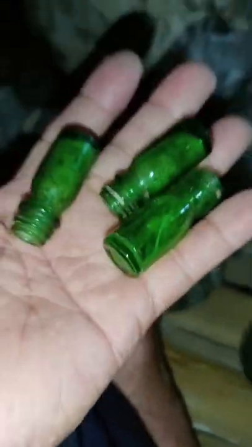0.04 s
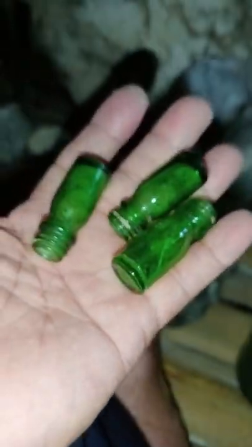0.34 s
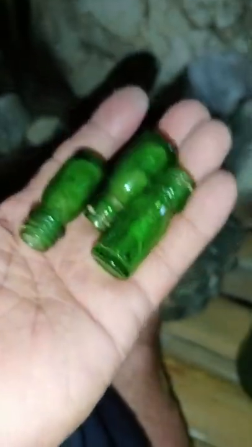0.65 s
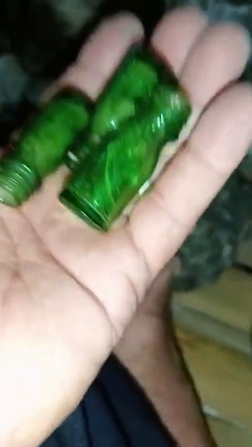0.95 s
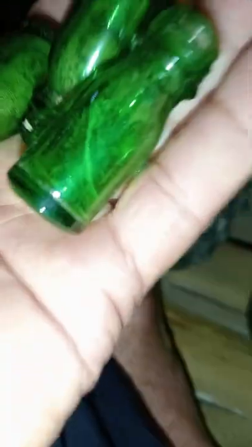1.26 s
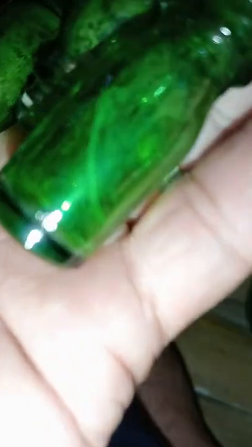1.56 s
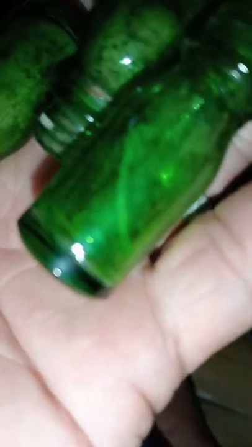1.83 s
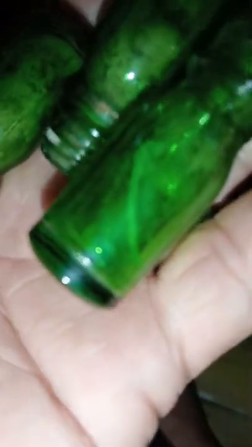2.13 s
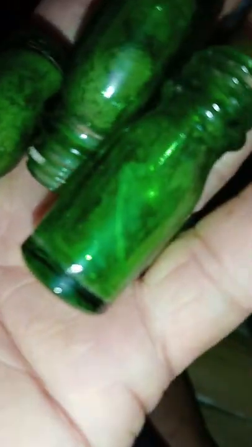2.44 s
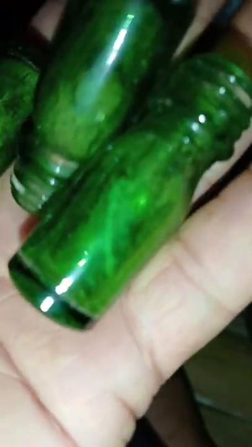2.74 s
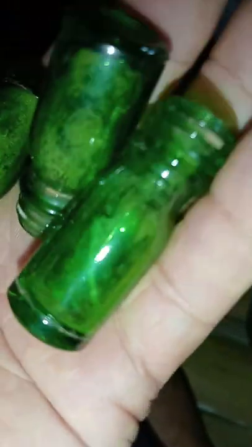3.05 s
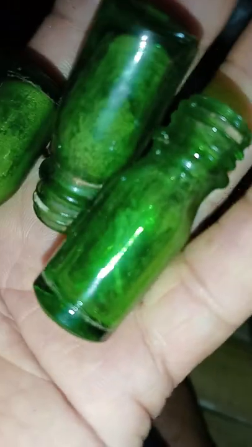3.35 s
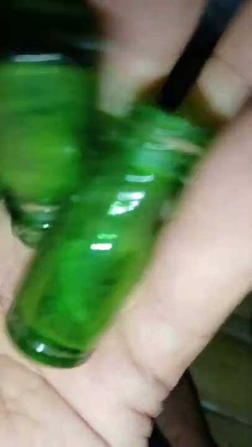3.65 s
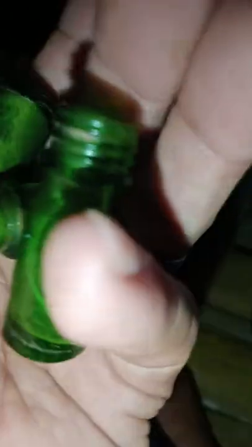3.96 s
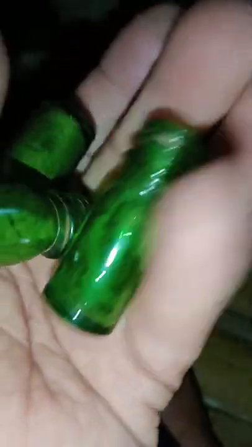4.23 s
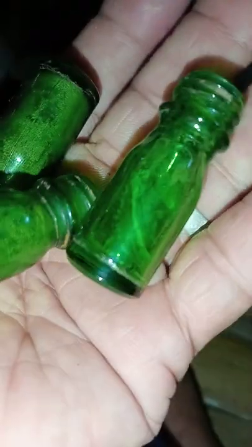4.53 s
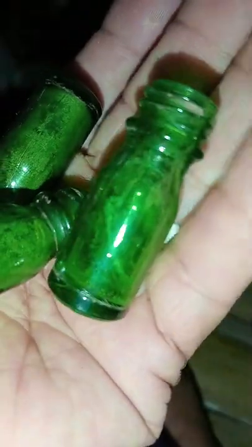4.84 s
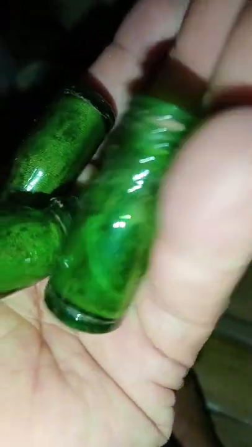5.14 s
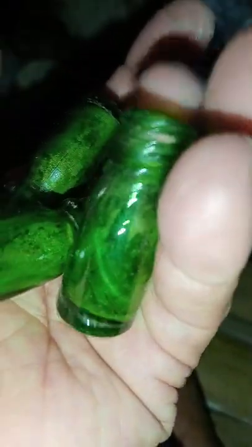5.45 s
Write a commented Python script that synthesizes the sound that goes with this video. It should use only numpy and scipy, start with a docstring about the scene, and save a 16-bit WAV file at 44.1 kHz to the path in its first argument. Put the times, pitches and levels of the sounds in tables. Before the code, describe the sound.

In a quiet spot open to the night, insects keep up a faint, high hiss with occasional thin chirps. Right by the microphone, little glass bottles shift in a hand: first a brief double clink, then scattered soft taps, then a bright flurry of knocks as they tumble together, and finally one more crisp clink. Skin cuts each ring short, and nearby surfaces add only a slight echo.

```python
"""A spot open to the night outside, with surfaces close by that answer briefly. Near the microphone,
three small glass bottles roll against each other in an open palm. The skin damps each contact to a
short clink, and the air in the bottles rings hollow. From outside come insects scraping their wings,
a few thin chirps and faint far whistles over a low hush."""
import sys
import numpy as np
from scipy import signal
from scipy.fft import rfft, irfft
from scipy.io import wavfile

SR = 44100
rng = np.random.default_rng(int(sys.argv[2]) if len(sys.argv) > 2 else 0)


def dump_mix(stems):
    """Bounce the given channels to the path in sys.argv[1] as a 16-bit WAV at rate SR."""
    frames = np.atleast_2d(stems).T  # one column per channel
    limited = np.clip(frames, -1, 1)  # hard clip at full scale
    pcm = np.round(limited * 32767).astype(np.int16)
    wavfile.write(sys.argv[1], SR, pcm)


N = 250929
TIME = np.arange(N) / SR


def from_db(db):
    return 10 ** (np.asarray(db) / 20)


def unit_rms(x):
    return x / np.sqrt(np.mean(x ** 2) + 1e-20)


def add(track, start, sound):
    """Mix a sound into a track at a start time in seconds."""
    at = max(0, round(start * SR))
    track[at:at + len(sound)] += sound[:N - at]


def butter(x, hz, kind, order=2):
    return signal.sosfilt(signal.butter(order, hz, kind, fs=SR, output="sos"), x)


def resonate(x, hz, width_hz):
    """Two-pole resonance with gain 1 at its peak."""
    radius = np.exp(-np.pi * width_hz / SR)
    feedback = [1, -2 * radius * np.cos(2 * np.pi * hz / SR), radius ** 2]
    return signal.lfilter(np.array([1, 0, -1]) * (1 - radius ** 2) / 2, feedback, x)


def drift(per_s):
    """Random wandering with a spread of about 1."""
    knots = rng.standard_normal(2000)
    return np.interp(TIME * per_s, np.arange(len(knots)), knots)


def throb(per_s, depth_db):
    """Slightly uneven pulsing of a song's level."""
    return from_db(depth_db * np.sin(2 * np.pi * (per_s * TIME + 0.36 * drift(2.7))))


def shaped_noise(spectrum):
    """Steady noise with the given spectrum; rms 1."""
    hz, db = np.transpose(spectrum)
    bin_hz = np.maximum(np.fft.rfftfreq(2 * N, 1 / SR), 1)
    gain = from_db(np.interp(np.log(bin_hz), np.log(hz), db))
    return unit_rms(irfft(rfft(rng.standard_normal(2 * N)) * gain)[:N])


def echoes(x, t60, build_s, band_hz):
    """Dense reflections that build up and die away; the tail has unit energy."""
    t = np.arange(SR // 2) / SR
    envelope = from_db(-60 * t / t60) * (1 - np.exp(-(t / build_s) ** 2))
    tail = butter(rng.standard_normal(len(t)), band_hz, "band") * envelope
    return signal.fftconvolve(x, tail / np.linalg.norm(tail))[:N]


# The background of the place. Each row: frequency in Hz, relative spectral level in dB.
HUSH_SPECTRUM = [(15, -41), (25, -29), (65, -2.5), (118, 3), (155, -1.5), (236, -2.5), (349, -4), (375, -4),
                 (506, -7), (595, -8.5), (1140, -13), (3970, -18), (6300, -23), (8190, -48), (13900, -120)]
def hush(level_db=-67.5, waver_db=0.15):
    """Low hush and hiss behind everything, steady but for a slight waver."""
    return from_db(level_db + waver_db * drift(per_s=3.18)) * shaped_noise(HUSH_SPECTRUM)


def wing_song(hz, width_hz):
    """An insect's scraping, heard through its wing resonance; rms 1."""
    scrape = rng.standard_normal(N)
    return unit_rms(resonate(resonate(scrape, hz, width_hz), hz, width_hz))


def crickets():
    """Three trills from outside, each a pulsing wing resonance."""
    low = from_db(-74.5) * wing_song(7097, 230) * throb(9.5, depth_db=2)
    middle = from_db(-68) * wing_song(8073, 700) * throb(10, depth_db=2)
    high = from_db(-77) * wing_song(8390, 360) * throb(9.4, depth_db=10)
    return low + middle + high


# One insect outside. Each row: start and end in seconds, opening level in dB, swell in dB per second.
BUZZ_BOUTS = [(-0.1, 0.986, -68, -1.0), (1.185, 2.74, -71.5, 0.8), (2.99, 4.573, -71, 3.0),
              (4.897, 5.09, -72, 0), (5.09, 5.8, -67, 0.5)]
def high_buzz(fade_s=0.11, far_db=-80.5):
    """Wings buzz in bouts around a narrow whine; others of the kind carry on far away."""
    bouts = np.zeros(N)
    for start, end, db, swell_db_per_s in BUZZ_BOUTS:
        gate = np.clip(0.5 + np.minimum(TIME - start, end - TIME) / fade_s, 0, 1)
        bouts += gate * from_db(db + swell_db_per_s * (TIME - start))
    wings = wing_song(11100, 400) + from_db(-2.5) * wing_song(10550, 770)
    whine = from_db(-4) * wing_song(10900, 70)
    return np.hypot(bouts, from_db(far_db)) * wings + bouts * whine


# Insects in the distance. Each row: frequency in Hz, relative spectral level in dB.
CHORUS_SPECTRUM = [(6000, -61), (6700, -19), (7500, -19), (8300, 1.5), (9300, 1), (10500, 14), (11300, 9.5),
                   (12000, -5), (13000, 2.5), (15500, 0.5)]
def far_chorus():
    """Many far insects merge into a steady high hiss."""
    return from_db(-71) * butter(shaped_noise(CHORUS_SPECTRUM), 7100, "high", order=4)


# Calls far from the microphone. Each row: start and length in seconds, pitch in Hz, level in dB.
WHISTLE_CALLS = [(-0.03, 0.081, 1010, -69.5), (0.111, 0.29, 970, -71), (0.404, 0.14, 1032, -69.5),
                 (0.492, 0.059, 2013, -66.5), (2.896, 0.12, 1634, -73.5)]
def far_whistles(fade_s=0.024):
    """Faint, wavering tones that flutter, blurred by their echoes."""
    calls = np.zeros(N)
    waver = 1 + 0.0145 * drift(per_s=80)
    for start, length, hz, db in WHISTLE_CALLS:
        gate = np.clip(np.minimum(TIME - start, start + length - TIME) / fade_s, 0, 1)
        calls += from_db(db) * gate * np.sin(2 * np.pi * hz * np.cumsum(waver) / SR)
    calls *= throb(15, depth_db=5.5)
    blur = echoes(calls, t60=0.15, build_s=0.006, band_hz=[500, 3000])
    return from_db(-4) * calls + from_db(-8) * blur


# Chirps outside, near and far. Each row: time in seconds, pitch in Hz, level in dB,
# share from 0 to 1 that reaches the microphone directly.
CHIRP_CALLS = [(0.075, 5270, -68.5, .15), (0.28, 5240, -66, 0.3), (2.08, 5050, -75, 0.1),
               (2.30, 4950, -73, .3), (2.554, 4590, -59.5, 0.96), (2.84, 4640, -61, 1),
               (3.43, 5370, -67.5, 0.6), (3.86, 5300, -65, 0), (4.074, 5080, -52, 1),
               (4.317, 5100, -52, 0.87)]
def pips(count=3, gap_s=0.0325):
    """The evenly spaced pips of every call, the first one lower and softer."""
    for start, hz, db, share in CHIRP_CALLS:
        yield start, hz - 110, db - 4, share
        for k in range(1, count):
            yield start + k * gap_s, hz, db, share


def chirps(pip_s=0.0061, fall_hz_per_s=28000, haze_s=0.018):
    """Thin falling pips; their lower ends linger as a diffuse echo, and far ones arrive only as a haze."""
    direct, scattered = np.zeros((2, N))
    t = np.arange(-SR // 14, SR // 14) / SR
    for centre, hz, db, share in pips():
        pip = np.exp(-(t / pip_s) ** 2) * np.sin(2 * np.pi * (hz - fall_hz_per_s * t / 2) * t)
        add(direct, centre + t[0], share * from_db(db) * pip)
        smear_s = pip_s + haze_s * (1 - share) ** 2
        swell = from_db(db) * np.sqrt(pip_s / smear_s) * np.exp(-(t / smear_s) ** 2)
        haze = butter(rng.standard_normal(len(t)), [hz - 450, hz + 150], "band", order=3)
        add(scattered, centre + t[0], swell * unit_rms(haze))
    return direct + from_db(-7) * echoes(scattered, t60=0.29, build_s=0.0016, band_hz=[2500, 7000])


def ringing(modes, t, scatter_db, detune):
    """Decaying sines; every blow shares its force out anew and meets a slightly different bottle."""
    hz, db, t60 = np.transpose(modes)[:, :, None]
    strength, shift = rng.standard_normal((2, len(modes), 1))
    sign = (-1) ** np.arange(len(modes))[:, None]
    decay = from_db(db + scatter_db * strength - 60 * t / t60)
    return np.sum(sign * decay * np.sin(2 * np.pi * hz * (1 + detune * shift) * t), axis=0)


# Glass on glass, close to the microphone. Each row: start in seconds, level in dB, number of touches,
# seconds to the first rebound, frequency in Hz that the touched spot favours, low cutoff in Hz,
# top in Hz set by the hardness of the touch, relative level of the hollow ring in dB.
BOTTLE_CONTACTS = [ (0.507, -53.5, 1, 0, 4700, 3500, 6500, -24),
                   (0.5492, -21.5, 3, 0.0047, 5200, 4260, 10000, -20.5),
                   (0.5588, -31.5, 4, 0.0039, 5050, 1600, 7800, -19),
                   (0.953, -50, 1, 0, 5000, 2800, 6500, -28), (0.9633, -43.5, 1, 0, 5060, 2500, 6500, -22),
                   (1.325, -50, 1, 0, 13800, 12800, 16000, -45),
                   (1.784, -34.5, 1, 0, 5700, 3300, 8750, -38),
                   (2.8665, -44.5, 2, 0.0032, 4030, 1200, 5060, -10),
                   (3.097, -42.5, 2, 0.0018, 5500, 2700, 6200, -22),
                   (3.495, -53.5, 1, 0, 5200, 2500, 6000, -24), (3.5798, -45.5, 1, 0, 4030, 1500, 5950, -7),
                   (3.6662, -35, 4, 0.0037, 4750, 2920, 9500, -26),
                   (3.7279, -40, 2, 0.0026, 6900, 2760, 7400, -38),
                   (3.9267, -13, 1, 0, 7000, 1000, 12600, -19.5),
                   (3.9493, -15, 1, 0, 7450, 2500, 11600, -19),
                   (3.951, -13, 2, 0.0042, 3300, 700, 14800, -27),
                   (3.9572, -15.5, 2, 0.0017, 8800, 2200, 12500, -29.5),
                   (3.967, -20.5, 3, .004, 6740, 2400, 12000, -32),
                   (4.0092, -31, 1, 0, 3450, 900, 6540, -7),
                   (4.012, -29.5, 2, 0.0004, 6800, 1200, 9500, -11.5),
                   (4.0339, -19, 1, 0, 6400, 706, 9150, -12), (4.0367, -13, 1, 0, 8750, 1290, 11400, -17.5),
                   (4.039, -18, 1, 0, 6700, 700, 12000, -22), (4.3151, -39.5, 1, 0, 3000, 1200, 7000, -2.5),
                   (4.364, -40, 1, 0, 6400, 3000, 11500, -7), (4.374, -38.5, 1, 0, 6800, 3000, 12500, -6),
                   (4.497, -48, 1, 0, 6400, 3500, 7500, -5.5),
                   (4.605, -50.5, 1, 0.0049, 4180, 1800, 5560, -22),
                   (5.2499, -19.5, 2, 0.0013, 9700, 4300, 10800, -38),
                   (5.252, -26, 1, 0, 9900, 2320, 10000, -19)]
def touches(loss_db=3, gap_share=0.94, top_share=0.9):
    """Every contact and its rebounds, each weaker, sooner and duller than the touch before."""
    for start, db, count, gap_s, spot_hz, low_hz, top_hz, hollow_db in BOTTLE_CONTACTS:
        for k in range(count):
            yield start, db - loss_db * k, spot_hz, low_hz, top_hz * top_share ** k, hollow_db
            start += gap_s * gap_share ** k


# Modes of the glass lying on skin, and of the air in the open bottles.
# Each row: frequency in Hz, relative level in dB, seconds to fall by 60 dB.
GLASS_MODES = [(2954, -14.5, 0.0074), (3300, -12, 0.0042), (3860, -13, 0.0061), (4224, -12, 0.0057),
               (5050, -13, 0.0051), (5700, -11.5, 0.0034), (6420, -22, 0.015), (6980, -6, 0.0033),
               (7250, -9, 0.0043), (7980, -17.5, 0.013), (8700, -6.5, 0.002), (9500, -5.5, 0.0066),
               (10400, -9, 0.0053), (11140, -4, 0.002), (12000, -45, 0.0018), (13300, -5.5, 0.0022)]
AIR_MODES = [(1017, -7.5, 0.014), (1403, -6, 0.039), (1557, -4.5, 0.026)]
def clinks(grit_t60=0.0038, energy_s=0.00093):
    """Each touch is a crack and a choked ring of the glass, and sets the air in the bottles sounding."""
    out = np.zeros(N)
    t = np.arange(SR // 12) / SR
    for start, db, spot_hz, low_hz, top_hz, hollow_db in touches():
        grit = rng.standard_normal(len(t)) * from_db(-9 - 60 * t / grit_t60)
        crack = from_db(4) * (t == 0) + grit
        glass = crack + ringing(GLASS_MODES, t, scatter_db=1.5, detune=0.011)
        glass += from_db(7) * resonate(glass, spot_hz, width_hz=800)
        glass = butter(glass, low_hz, "high", order=4)  # a blow on the thick base barely bends the wall
        glass += from_db(-15) * butter(crack, [650, 1500], "band", order=3)  # the whole bottle recoils
        glass = butter(glass, top_hz, "low", order=4)  # a soft touch lasts longer and loses the top
        glass /= np.sqrt(np.sum(glass ** 2) / (energy_s * SR))  # as much energy as rms 1 for energy_s
        hollow = from_db(hollow_db) * ringing(AIR_MODES, t, scatter_db=2.75, detune=0.023)
        add(out, start, from_db(db) * (0.6 * glass + hollow))
    return out


# Surfaces near the hand. Each row: delay after the direct sound in seconds, relative level in dB.
REFLECTIONS = [(0.0076, -23), (0.0098, -21.5), (0.012, -20.5), (0.0181, -28)]
def nearby_surfaces(direct):
    """The direct sound with a short blur, dulled first reflections and a faint longer tail."""
    out = direct + from_db(-12.5) * echoes(direct, t60=0.1, build_s=0.0021, band_hz=[1000, 10500])
    dulled = butter(direct, 9700, "low")
    for delay, db in REFLECTIONS:
        add(out, delay, from_db(db) * dulled)
    return out + from_db(-29) * echoes(direct, t60=0.41, build_s=0.012, band_hz=[500, 10000])


# Movements in the palm, close up. Each row: peak time and half-width in seconds, level in dB.
PALM_SHIFTS = [(0.576, 0.063, -67.5), (1.883, 0.081, -65), (3.732, 0.054, -69), (4.043, 0.15, -66.5),
               (4.354, 0.055, -69.5), (5.287, 0.038, -68), (5.56, 0.029, -67)]
def palm_rustle():
    """Soft low rustle as the glass slides and settles on the skin."""
    motion = sum(from_db(db) * np.exp(-((TIME - peak) / width) ** 2) for peak, width, db in PALM_SHIFTS)
    return motion * unit_rms(butter(rng.standard_normal(N), [150, 480], "band"))


def rasp(start_s=0.98, end_s=3.39, gap_s=0.107, stroke_s=0.041, swell_db_per_s=6.2):
    """The nearest insect: one run of evenly spaced wing strokes that swells, then holds."""
    peaks = np.arange(start_s, end_s, gap_s)
    gains = from_db(np.minimum(-76 + swell_db_per_s * (peaks - start_s), -65))
    strokes = sum(gain * np.exp(-((TIME - peak) / stroke_s) ** 2) for peak, gain in zip(peaks, gains))
    return strokes * wing_song(8740, 680)


def scene():
    """The bottles in the hand, close by, over the sounds of the night; one channel."""
    background = hush()
    bottles = nearby_surfaces(clinks()) + palm_rustle()
    insects = crickets() + high_buzz() + far_chorus() + rasp()
    return (background + bottles + insects + chirps() + far_whistles())[None]


def record(dry, knee_hz=11400, treble_db=-9, cutoff_hz=15700):
    """The microphone loses treble above the knee, and the very top is cut."""
    below = butter(dry, knee_hz, "low", order=10)
    above = butter(dry, knee_hz, "high", order=10)
    top_cut = signal.ellip(10, 0.1, 80, cutoff_hz, fs=SR, output="sos")
    return signal.sosfilt(top_cut, below - from_db(treble_db) * above)


dry = scene()
out = record(dry)
dump_mix(out)
```